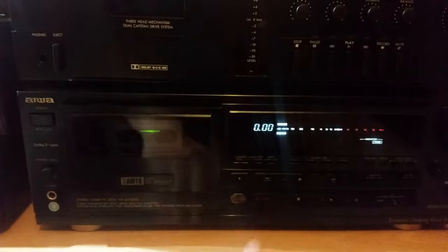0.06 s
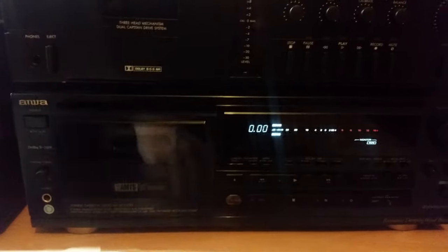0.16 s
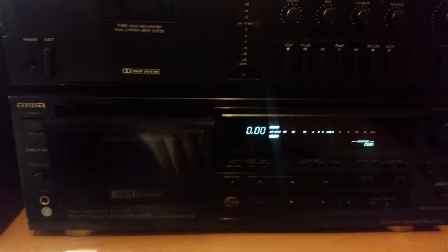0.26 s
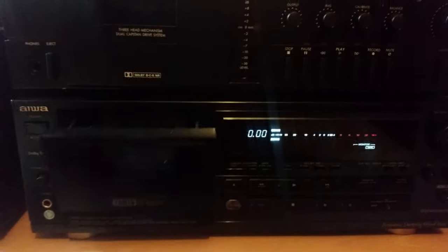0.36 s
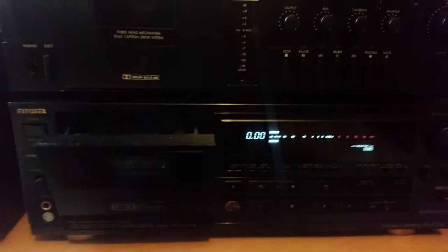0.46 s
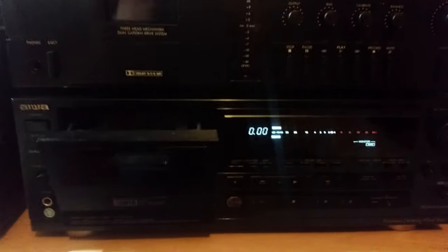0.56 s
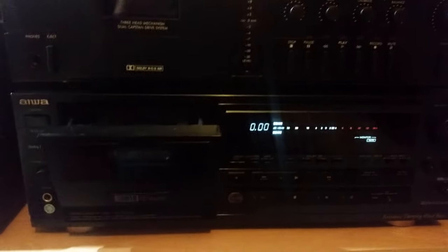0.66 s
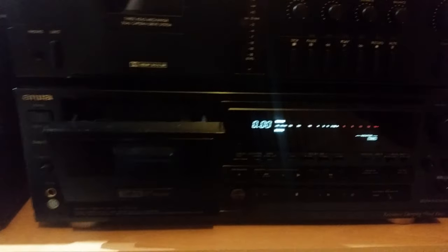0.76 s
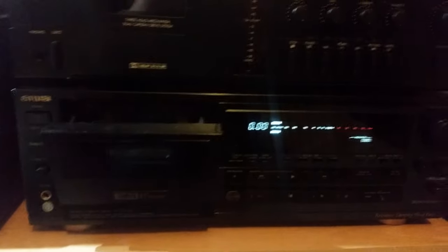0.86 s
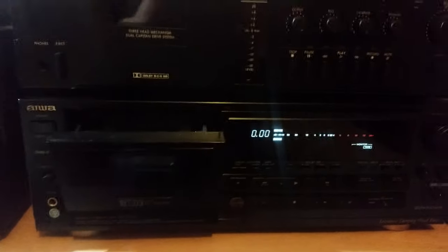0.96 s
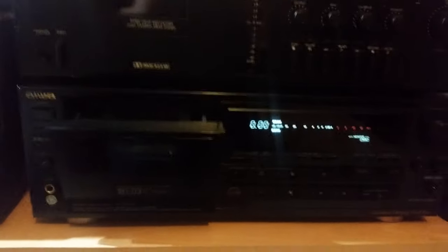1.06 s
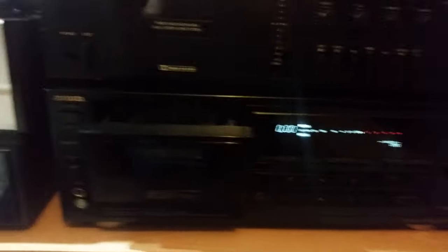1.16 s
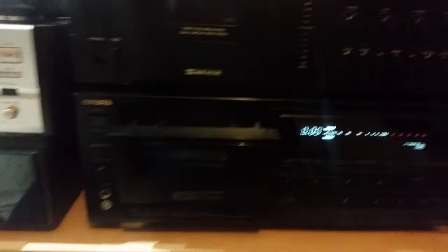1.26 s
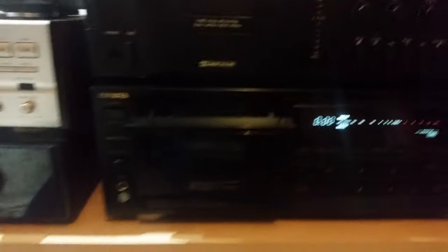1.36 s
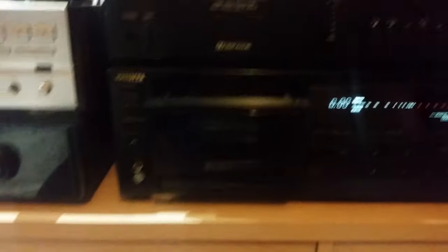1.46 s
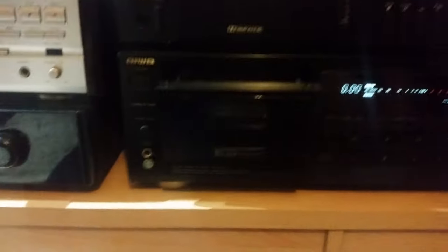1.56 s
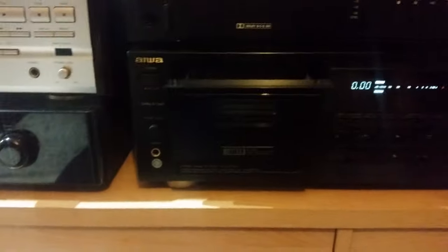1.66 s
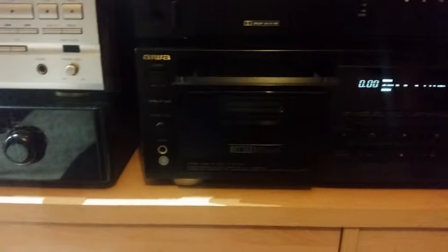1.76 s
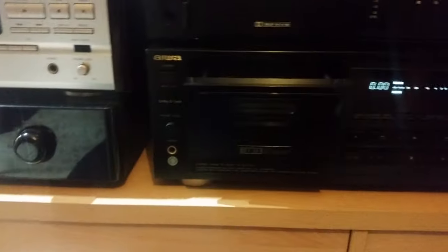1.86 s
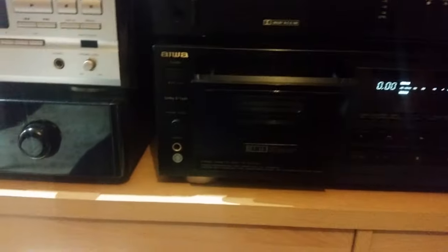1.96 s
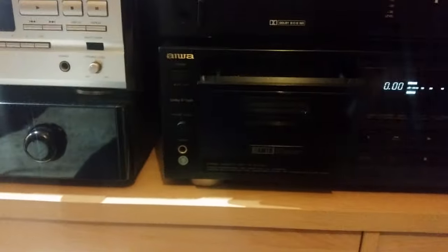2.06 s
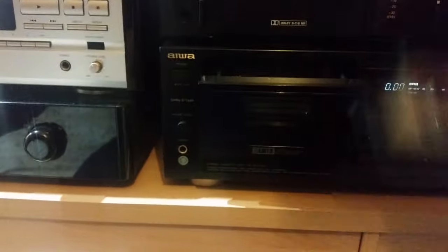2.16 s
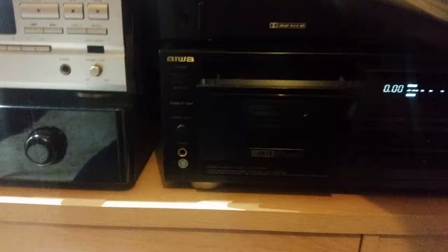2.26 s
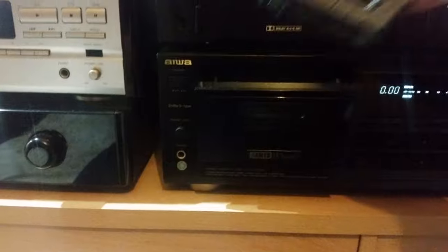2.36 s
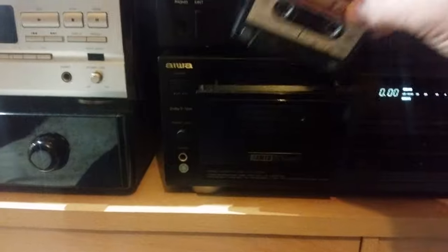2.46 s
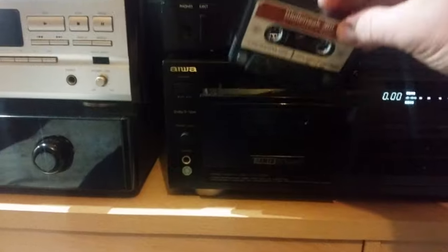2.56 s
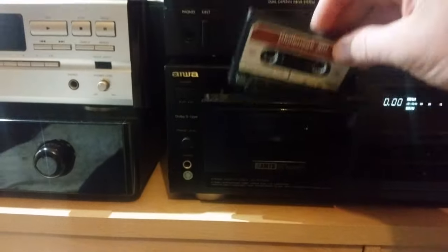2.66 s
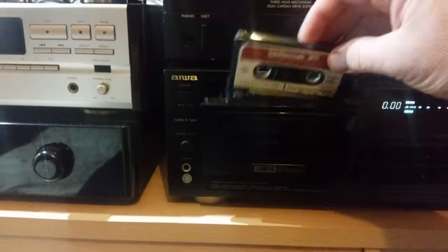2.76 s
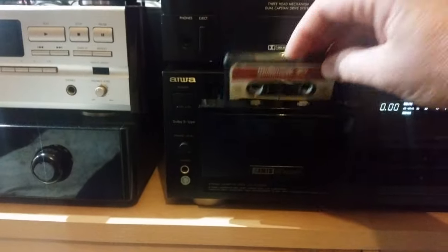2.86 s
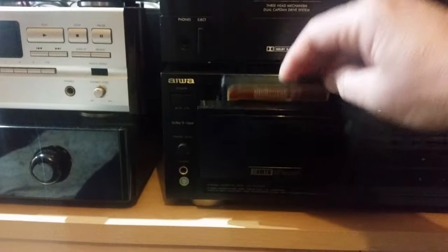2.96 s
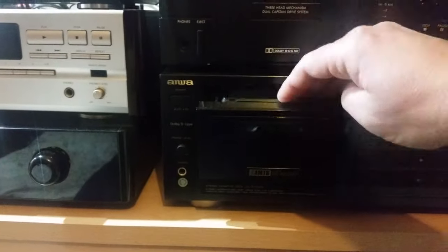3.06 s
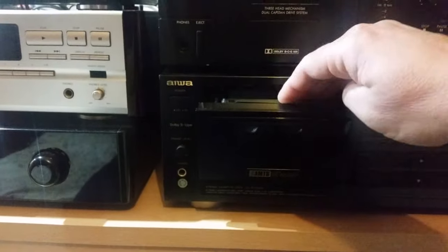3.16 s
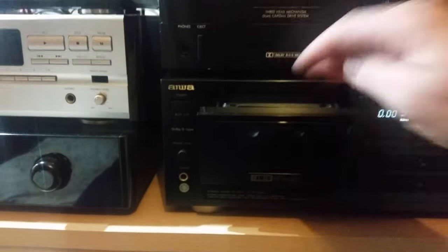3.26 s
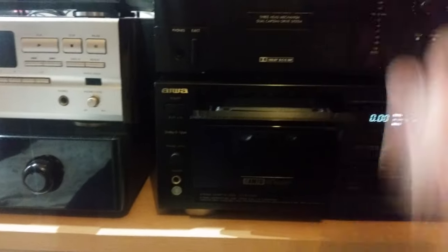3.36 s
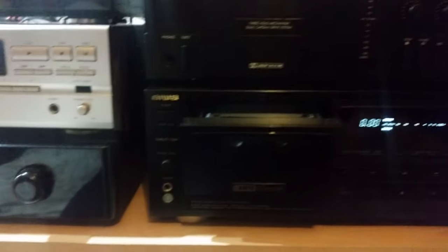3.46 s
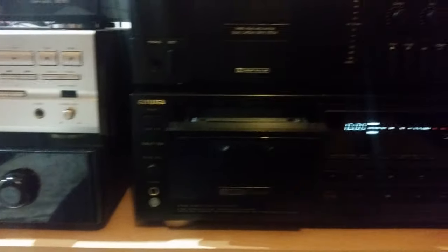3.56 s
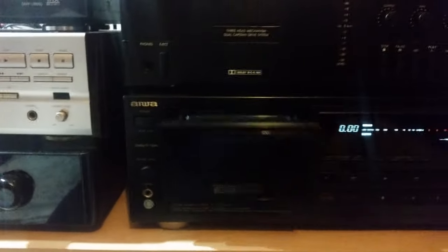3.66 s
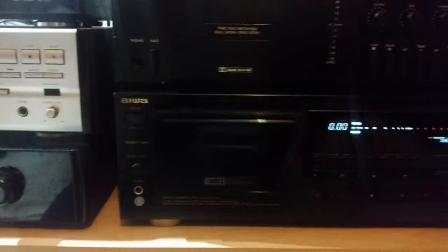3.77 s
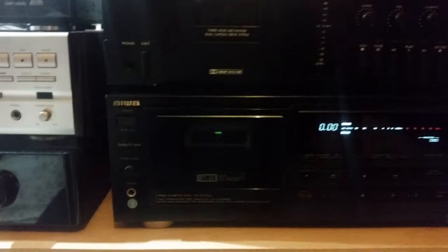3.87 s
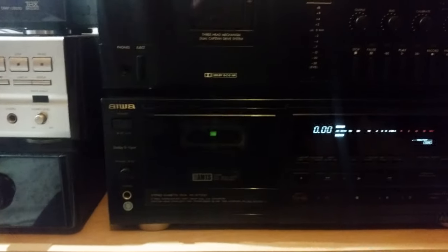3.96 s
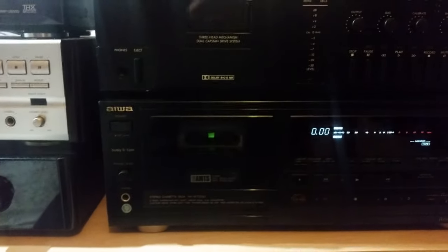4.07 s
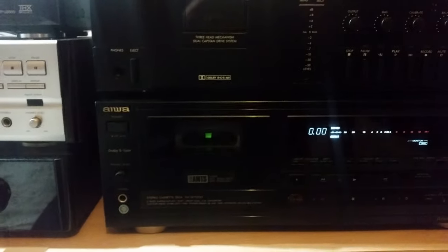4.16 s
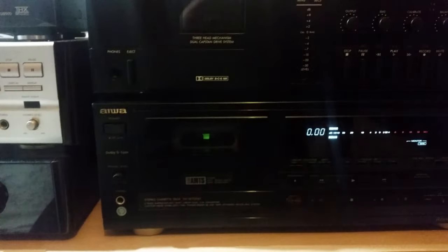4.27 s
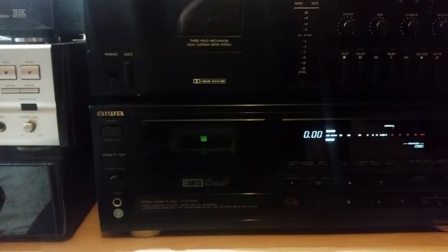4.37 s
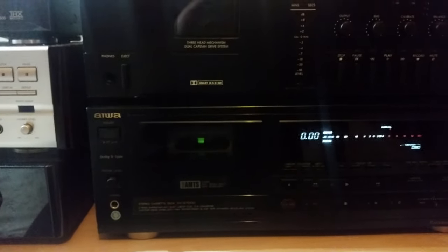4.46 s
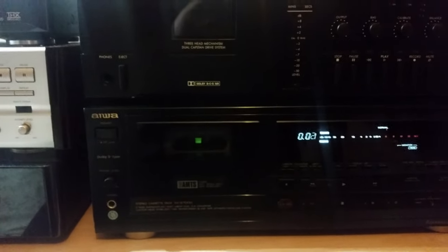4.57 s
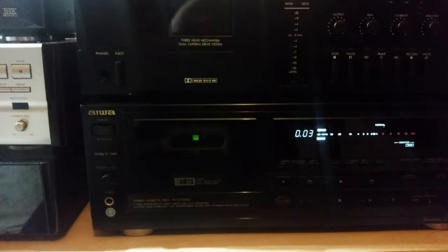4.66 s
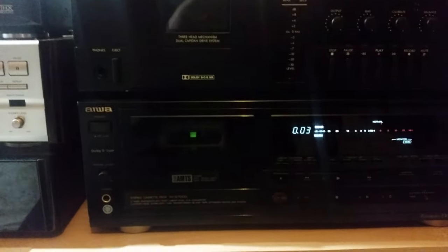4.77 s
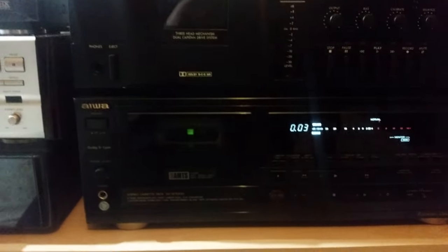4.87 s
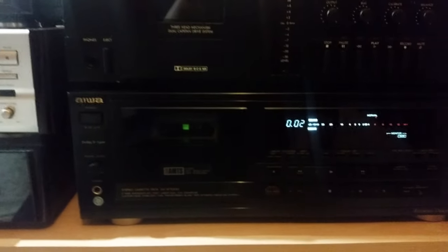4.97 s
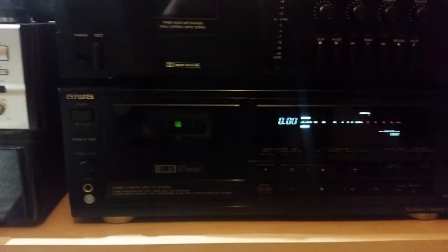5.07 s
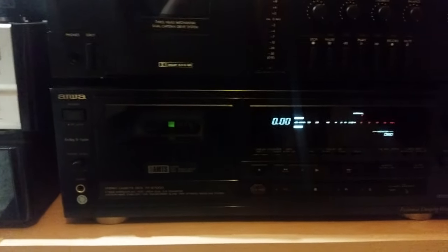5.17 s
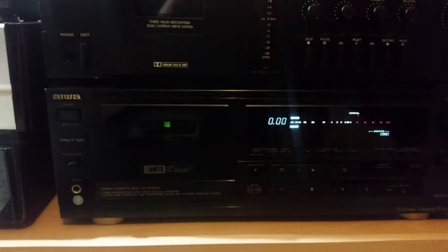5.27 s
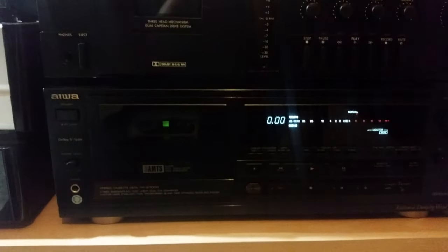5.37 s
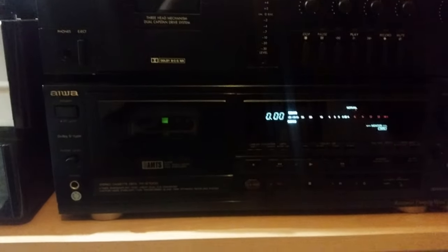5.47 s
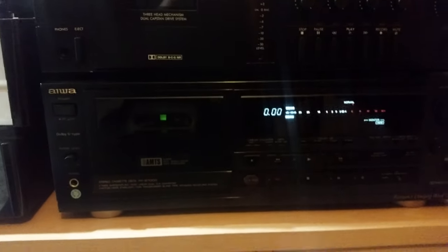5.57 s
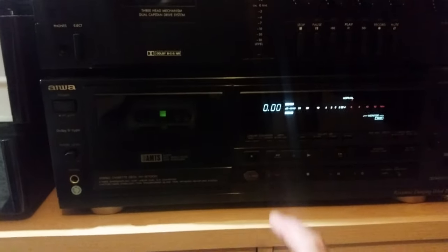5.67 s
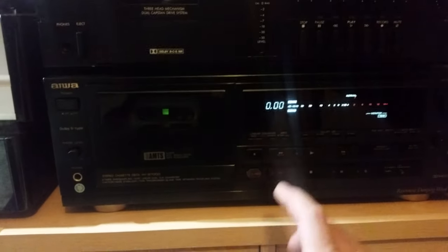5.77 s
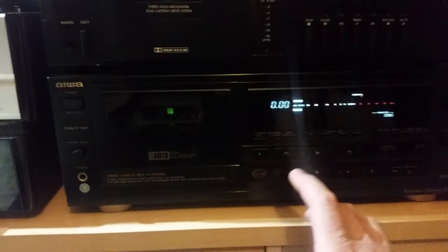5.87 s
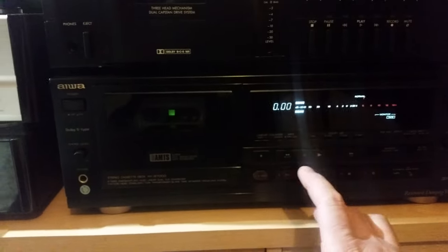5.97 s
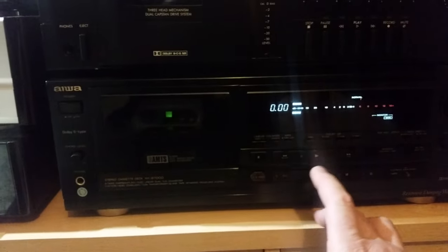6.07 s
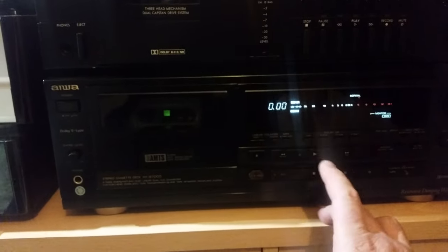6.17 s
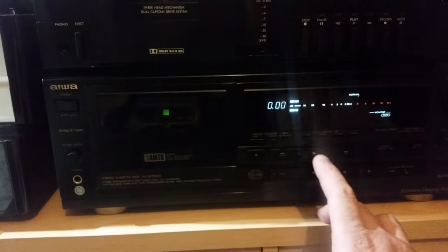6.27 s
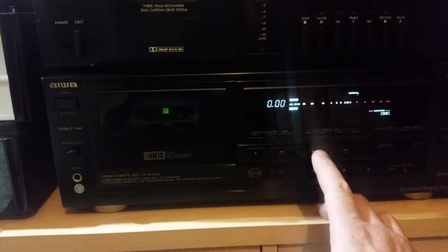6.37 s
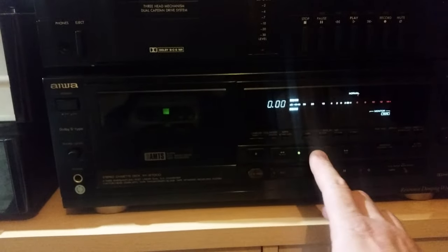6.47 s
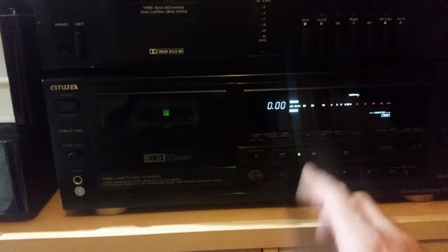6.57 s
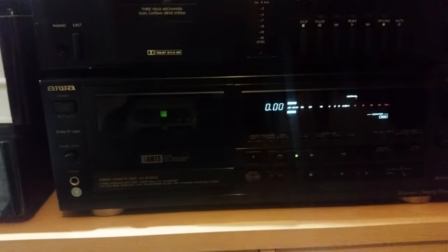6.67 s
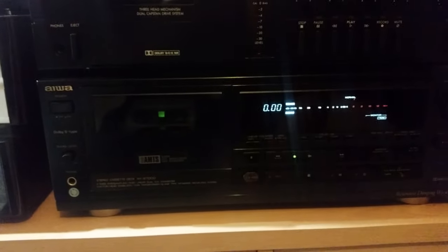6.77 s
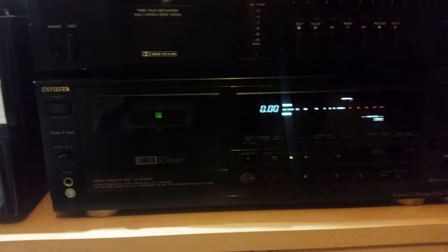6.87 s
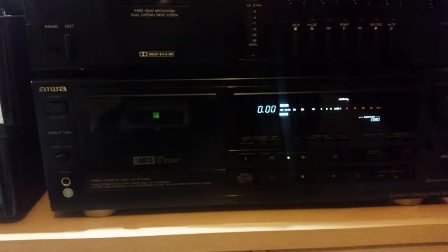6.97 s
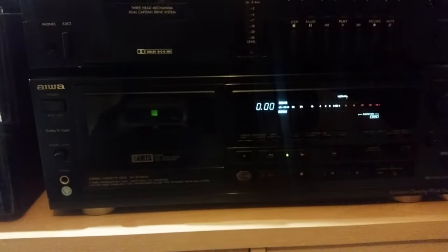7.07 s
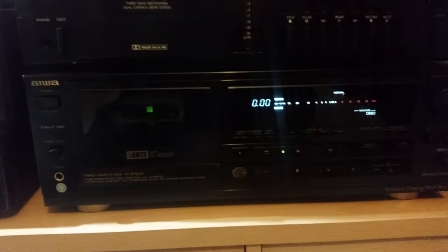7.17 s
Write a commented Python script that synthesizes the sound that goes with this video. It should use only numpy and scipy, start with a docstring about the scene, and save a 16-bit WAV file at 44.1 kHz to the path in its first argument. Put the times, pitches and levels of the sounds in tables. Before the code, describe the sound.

A quiet room with low rumble, rushing air and faint hiss, heard close through a hand-held camera. Tiny ticks come at the start and 0.3 s. From about 0.87 to 1.3 s fingers rub and bump the microphone: dull, heavy thumps, strongest near 1.2, with scrapes, sharp peeling ticks and a brief low ring. The background dips around 1.9. A crisp plastic click snaps at 2.35, with smaller ones after. At 2.75 the cassette knocks and slides in grainy scrapes, then clacks hard at 3.12 with rattling. Faint sliding at 3.7 and 3.95 leads to the door's loud, hollow clunk at 4.1. A short motor drone at 4.3 and irregular small clacks run until 5.25, with a faint spring ring at 4.8. Near-quiet follows. A key clicks at 6.5, then soft mechanical taps continue, with a firmer clunk at 7.2.

```python
"""Cassette deck at close range

In a quiet room a cassette is slid into a tape deck, the door is pushed shut and the transport clunks through
its steps; a key starts it again. Blows rattle loose parts and ring the chassis, and parts slide in fine grains.
A hand-held camera is close by: fingers shift their grip, rub and bump its two microphone ports and make its
case tick. Noise makes the rubs and decaying sines the rings, over low rumble, a rush of air and hiss."""
import sys
import numpy as np
from scipy.fft import rfft, irfft, next_fast_len
from scipy.io import wavfile

SR = 44100
rng = np.random.default_rng(int(sys.argv[2]) if len(sys.argv) > 2 else 0)


def materialize(psi):
    """Save the field psi as 16-bit PCM at rate SR to the path in sys.argv[1].

    A 1-D psi becomes a single channel; in a 2-D psi each row is a channel.
    """
    bounded = np.clip(np.atleast_2d(psi).T, -1, 1)
    quanta = np.round(bounded * 32767).astype(np.int16)
    wavfile.write(sys.argv[1], SR, quanta)


N = 318402  # length in samples
T = np.arange(SR // 2) / SR  # seconds since a blow


def amp(db):
    """Decibels to gain."""
    return 10 ** (np.asarray(db) / 20)


def unit(x):
    """Scale to rms 1."""
    return x / np.sqrt(np.mean(x ** 2) + 1e-20)


def fade(t60):
    """Exponential decay after a blow: 60 dB in t60 seconds."""
    return amp(-60 * T / max(t60, 1e-4))


def attack(rise):
    """Smooth onset of a blow with a time constant of rise seconds."""
    return 1 - np.exp(-T / rise)


def along(points, hz):
    """Values at hz, read from (Hz, value) points on a log axis."""
    f, v = np.transpose(points)
    return np.interp(np.log(hz + 1), np.log(f + 1), v)


def sides(lr_db):
    """Left and right gains with a mean of 1 for a left-right difference in dB."""
    g = amp(np.array([np.atleast_1d(lr_db), -np.atleast_1d(lr_db)]) / 2)
    return g / g.mean(0)


def noise(spectrum, pan=((1, 0),), alike=((1, 0),), size=N):
    """Coloured stereo noise whose middle has rms 1."""
    padded = next_fast_len(size)
    hz = np.fft.rfftfreq(padded, 1 / SR)
    common, apart = rfft(rng.standard_normal((2, padded)))
    # a wider turn mixes in more of the part that is opposite on the two sides
    turn = np.arccos(np.clip(along(alike, hz), -1, 1)) / 2
    pair = common * np.cos(turn) + np.array([apart, -apart]) * np.sin(turn)
    coloured = pair * amp(along(spectrum, hz)) * sides(along(pan, hz))
    x = irfft(coloured)[:, :size]
    return x / x.mean(0).std()


def grain(rate, depth_db, size=N):
    """Random gain of rms 1 with about rate new values a second."""
    knots = rng.standard_normal(size)
    wander = np.interp(np.arange(size) * rate / SR, np.arange(size), knots)
    return unit(amp(depth_db * np.clip(wander, -2, 2)))


def stroke(s, length, attack_s, release_s):
    """Gain of a movement that starts, holds for its length and dies away."""
    t = np.maximum(np.arange(N) / SR - s, 0)
    hold = np.exp(-np.clip((t - length) / release_s, 0, 50))
    return (1 - np.exp(-t / attack_s)) * hold


def add(track, s, x):
    """Mix a stereo sound in at time s."""
    start = round(s * SR)
    track[:, start:start + x.shape[1]] += x[:, :N - start]


# blows of the cassette, the door and the transport: start_s, level_db, body_db, snap_db
BLOWS = [(0.062, -46.5, 5, -12), (2.739, -31.5, -10, -18), (2.773, -28.5, -8.5, -13),
         (3.119, -19, -9.5, -1), (3.123, -15, -10.5, -14.5), (3.147, -21, -3.5, -13),
         (4.015, -24, -15, -18), (4.032, -37, -18, -5), (4.049, -34.5, -0.5, 1.5), (4.062, -33, -3, -9),
         (4.11, -13, -6.5, -13), (4.118, -30.5, -6, -1), (4.157, -43.5, -3, 1), (4.287, -34, -13, -25),
         (4.335, -39.5, 2, -25), (4.403, -34, -0.5, -28), (4.47, -30, -2, -11), (4.481, -32, 3.5, -17),
         (4.523, -31, 1, -6), (4.625, -27, -4, -15), (4.639, -36, -2, -1.5), (4.712, -34, 2, -7),
         (4.733, -30.5, -2, -6), (4.82, -34, -37, -6), (4.907, -26.5, -3.5, -13.5),
         (4.958, -31.5, -0.5, -6.5), (5.044, -30, -13, -12.5), (5.082, -29.5, -1, -12.5),
         (5.138, -34, -1, -7), (5.162, -29, -3.5, -8), (5.221, -38.5, -3, -23), (5.248, -32.5, -6, -6.5),
         (6.512, -29.5, -23, -37), (6.614, -35, -7.5, -20), (6.633, -33, -11, -32),
         (6.706, -35.5, -2.5, -24), (6.866, -31.5, 3, -20), (6.91, -31.5, -6.5, -11.5),
         (7.038, -34.5, -5.5, -8.5), (7.098, -36.5, -1, -10), (7.182, -24, -14, -9)]
# tone of the loose parts: pitch_hz, level_db
CLATTER = [(25, -33), (60, -21.5), (200, 9.5), (400, -22.5), (600, -2), (900, -6), (1500, -1), (2100, -6),
           (2600, -10.5), (3800, -12.5), (5500, -32.5), (9000, -41.5), (16000, -53)]
# tone of the bright crack: pitch_hz, level_db
SNAP = [(1500, -33), (4000, 0.5), (6000, -8.5), (8500, -11.5), (11500, 0.5), (15000, 4.5), (16000, -1),
        (17000, -66)]
# how far the deck sits to the left: pitch_hz, left_minus_right_db
DECK_PAN = [(100, 1.5), (380, 4), (700, 6.5), (1300, 10.5), (2400, 14), (4400, 2), (8000, 3.5), (12000, -2),
            (15000, 6.5)]
# how alike the deck is at the two ports: pitch_hz, likeness (1 = same)
DECK_ALIKE = [(100, 0.92), (640, 0.82), (1400, 0.57), (3000, 0.085)]
USUAL_BLOW_DB, RATTLE_T60_S = -24.5, 0.061  # a blow at the usual level rattles this long
RATTLE_DOUBLES_DB = 32  # a blow harder by this much rattles twice as long
TRAY_SHEET_DB, CLOSED_S = -6, 3.8  # the sheet panels ring less while the door hangs open
LEAD_S, LEAD_DB = .006, -20  # parts graze each other just before they strike


def deck():
    """Each blow cracks, then loose plastic and steel parts rattle; the chassis rings and the room answers."""
    out = np.zeros((2, N))
    size = len(T)
    for s, db, body_db, snap_db in BLOWS:
        rattle_t60 = RATTLE_T60_S * 2 ** ((db - USUAL_BLOW_DB) / RATTLE_DOUBLES_DB)
        contacts = grain(rate=820, depth_db=4.0, size=size) * attack(0.00076)
        strike = amp(3.5) * fade(0.0064) * attack(0.00055)
        # the slow last term of each envelope is the room's answer
        clatter_gain = strike + contacts * fade(rattle_t60) + amp(-9) * fade(0.24)
        clatter = noise(CLATTER, DECK_PAN, DECK_ALIKE, size) * clatter_gain
        snap_gain = contacts * fade(0.58 * rattle_t60) + amp(-11) * fade(0.22)
        snap = noise(SNAP, DECK_PAN, size=size) * snap_gain
        sheet_db = TRAY_SHEET_DB * (2 < s < CLOSED_S)
        body = chassis(body_db - 0.5, body_db + 1.0 + sheet_db)
        graze = noise(CLATTER, DECK_PAN, DECK_ALIKE, size) * fade(0.068)
        add(out, s - LEAD_S, amp(db + LEAD_DB) * graze)
        add(out, s, amp(db) * (amp(-10.0) * clatter + amp(snap_db - 5.0) * snap + amp(-2.5) * body))
    return out


# modes of the deck's chassis and panels: pitch_hz, level_db, t60_s
CHASSIS = [(92, -3.5, 0.34), (132.5, -16.5, 0.45), (153.1, -7.5, 0.39), (173.4, 3, 0.17), (217.9, 3, 0.18),
           (284, -1, 0.12), (515.5, -0.5, 0.14), (556.2, 4.5, 0.1), (620, 4.5, 0.062), (737, -12, 0.16),
           (949.6, -3.5, 0.059), (1242, -6.5, 0.063), (1429, -12, 0.058), (1577, -7.5, 0.045),
           (1890, -18, 0.16), (2077, -23.5, 0.15), (2240, -25, 0.17), (2360, -30, 0.057),
           (2960, -21.5, 0.096), (3220, -28, 0.093)]


def chassis(thud_db, panel_db, bass_db=-4, sheet_db=-3, scatter_db=2, detune=.012, rise=0.0041):
    """Blows ring modes at new strengths, shifted by the load; heavy parts drive the frame and sheet panels."""
    ring = 0
    for hz, db, t60 in CHASSIS:
        level, shift, phase, skew = rng.standard_normal(4)
        weight_db = thud_db + bass_db if hz < 400 else panel_db + sheet_db if hz < 800 else 0
        # high modes reach the two ports out of step
        apart = skew * np.arccos(np.clip(along(DECK_ALIKE, hz), -1, 1))
        shifted_hz = hz * (1 + detune * shift)
        wave = np.sin(2 * np.pi * shifted_hz * T + np.pi * phase + np.array([[0], [apart]]))
        gain = amp(db + weight_db + scatter_db * level) * sides(along(DECK_PAN, hz))
        ring = ring + gain * fade(t60) * wave
    return ring * attack(rise)


# runs of the cam motor: start_s, length_s, drone_db, gear_db
RUNS = [(4.297, 0.083, -40.5, -51.5), (4.44, 0.823, -56, -54.5), (6.6, 0.46, -54.5, -58.5)]
# tone of the drone: pitch_hz, level_db
DRONE = [(60, -16), (100, 7), (170, 4.5), (230, -3), (380, -50.5)]
SPIN_UP_S, SPIN_DOWN_S = 0.015, 0.038


def motor():
    """The motor drones through the chassis while it turns the cam."""
    load = sum(amp(db) * stroke(s, length, SPIN_UP_S, SPIN_DOWN_S) for s, length, db, _ in RUNS)
    return load * noise(DRONE, DECK_PAN, DECK_ALIKE)


# modes of a small spring: pitch_hz, level_db, t60_s
SPRING = [(3240, -2.5, 0.41), (5030, -8, 0.32), (6700, -23, 0.21), (7262, -17, 0.13), (9771, -23, .25)]
LEAD_IN_S, LEAD_IN_DB = 0.037, -4  # a softer ring fades in shortly before the main ring


def spring(s=4.821, db=-50):
    """A small spring rings and shivers, with a soft lead-in."""
    out = np.zeros((2, N))
    lead_in = amp(LEAD_IN_DB) * attack(0.0076)
    for start, swell in [(s, 1), (s - LEAD_IN_S, lead_in)]:
        ring = 0
        for hz, level, t60 in SPRING:
            wave = np.sin(2 * np.pi * (hz * T + rng.random()))
            shiver = grain(rate=120, depth_db=5.0, size=len(T))
            ring = ring + amp(db + level) * fade(t60) * wave * shiver
        add(out, start, sides(2.6) * swell * ring)
    return out


# plastic slides on plastic, as the cassette goes in and the door swings: start_s, length_s, level_db
SLIDES = [(2.3, 0.016, -49.5), (2.772, 0.14, -57.5), (2.911, .02, -47.5), (2.961, 0.132, -47),
          (3.185, 0.14, -53), (3.666, 0.12, -53.5), (3.952, 0.15, -46)]
# tone of the sliding plastic and the gears: pitch_hz, level_db
FRICTION = [(300, 4.5), (1000, 3), (1900, 2.5), (2800, -7), (4500, -9.5), (6500, -26.5), (8500, -32),
            (12000, -14.5), (16000, -17), (17000, -48)]
SLIDE_ATTACK_S, SLIDE_RELEASE_S = 0.0054, 0.021
SLIDE_SWELL_DB = 9.5  # the push grows by this much through each slide


def sliding():
    """The cassette shell, the hinge and the gears catch and slip in fine grains."""
    t = np.arange(N) / SR
    push = 0
    for s, length, db in SLIDES:
        swell_db = SLIDE_SWELL_DB * np.clip((t - s) / length - 1, -1, 0)
        push = push + amp(db + swell_db) * stroke(s, length, SLIDE_ATTACK_S, SLIDE_RELEASE_S)
    gears = sum(amp(db) * stroke(s, length, SPIN_UP_S, SPIN_DOWN_S) for s, length, _, db in RUNS)
    catches = grain(rate=77, depth_db=1.0) * grain(rate=600, depth_db=3)
    return (push + gears) * catches * noise(FRICTION, DECK_PAN, DECK_ALIKE)


# strokes of skin over the ports: start_s, length_s, scrape_db, judder_db, left_minus_right_db
RUBS = [(0.874, 0.037, -27.5, -47, 22), (0.9146, 0.0577, -21, -12.5, 34), (0.978, 0.041, -20.5, -24.5, 24),
        (1.023, 0.096, -40.5, -34.5, 20), (1.159, 0.034, -19.5, -18, 4), (1.202, 0.113, -47, -36.5, 8)]
# fingertips bump a port: start_s, level_db, pitch_hz, left_minus_right_db
BUMPS = [(0.551, -31.5, 106, -3), (0.876, -20.5, 157, 26), (0.9164, -12.5, 114, 34), (1.027, -6.5, 82, 30),
         (1.0571, -3, 370, 42), (1.062, -7.5, 105, 39), (1.1753, 4.5, 640, 20), (1.183, -10, 59.6, -7),
         (1.189, -10, 129, -29), (1.1926, -9.5, 168, 36), (1.253, -9, 182, -20)]
# skin peels off, mostly at the right port: start_s, level_db
PEELS = [(1.069, -33.5), (1.134, -22.5), (1.1456, -16.5), (1.1532, -16), (1.172, -24), (1.191, -19),
         (1.255, -24.5), (1.304, -29.5)]
# tone of scraping skin: pitch_hz, level_db
SCRAPE = [(100, -1), (300, 2.5), (900, -1.5), (1800, -6), (2800, -26.5), (4000, -22.5), (6000, -54),
          (10000, -44)]
# tone of juddering skin: pitch_hz, level_db
JUDDER = [(15, -15), (50, -13), (130, 1), (220, -6.5), (400, -6.5), (900, -55.5)]
RUB_ATTACK_S, RUB_RELEASE_S = 0.0017, .005
RUB_HISS_DB, RUB_HISS_SPREAD = -29.5, 0.33  # hiss under the scrape; share of the L-R difference that it keeps


def fingers():
    """Skin judders across the ports, bumps them and peels off in sharp ticks."""
    scrape = amp(-8.5) * noise(SCRAPE) * grain(rate=500, depth_db=3)
    judder = amp(-11.0) * noise(JUDDER)
    hiss = amp(RUB_HISS_DB) * noise(SNAP)
    out = np.zeros((2, N))
    for s, length, scrape_db, judder_db, lr_db in RUBS:
        drag = sides(lr_db) * (amp(scrape_db) * scrape + amp(judder_db) * judder)
        rub_hiss = sides(RUB_HISS_SPREAD * lr_db) * amp(scrape_db) * hiss
        out += stroke(s, length, RUB_ATTACK_S, RUB_RELEASE_S) * (drag + rub_hiss)
    for s, db, hz, lr_db in BUMPS:
        # the skin slaps, and the air trapped in the port swings about once
        slap = amp(-17.0) * noise(SCRAPE, size=len(T)) * fade(0.0088)
        push = np.sin(2 * np.pi * hz * T) * fade(3.96 / hz)
        add(out, s, amp(db - 5.0) * sides(lr_db) * (slap + push) * attack(0.00032))
    for s, db in PEELS:
        add(out, s, amp(db - 11.5) * sides(-9) * noise(SNAP, size=len(T)) * fade(0.0059))
    return out


def camera_ring(s=1.194, hz=242, db=-25, t60=0.36):
    """A low ring in the camera's body follows the cluster of bumps."""
    out = np.zeros((2, N))
    add(out, s, amp(db) * sides(29) * np.sin(2 * np.pi * hz * T) * fade(t60))
    return out


# small plastic ticks of the camera case, the cassette and the key:
# start_s, level_db, pitch_hz, crack_db, left_minus_right_db
TICKS = [(0.024, -39.5, 1070, 10, -3), (0.2869, -26, 1550, -18, 20), (1.311, -37, 1900, -4, 13.5),
         (1.377, -31.5, 1690, -8, 13), (1.506, -41.5, 1500, -13, 12), (2.3455, -11, 1720, -18.5, 10),
         (2.367, -21, 1640, -16, 10), (2.383, -30.5, 1750, -9, 17), (2.437, -22, 2230, -3, 20),
         (2.452, -23.5, 1490, -13, 11), (2.7743, -26, 1090, 2, 12), (3.124, -13, 2050, -13, 11),
         (3.283, -38, 1950, -0.5, 11), (6.498, -47, 1500, 9, 7), (6.512, -29.5, 1560, -5, 12)]
# modes of a tick: pitch_ratio, level_db, t60_s
CASE = [(0.998, 7.5, 0.0078), (1.28, -7.5, 0.023)]
# tone of the plastic shell: pitch_hz, level_db
CASE_TONE = [(400, -33), (900, 5), (1500, 6.5), (2100, 6), (2700, -4.5), (3300, -7.5), (4200, -16.5),
             (6000, -53), (9000, -38)]


def ticks():
    """Stiff plastic gives way with a very short ring; a crack spreads wider and the room answers faintly."""
    out = np.zeros((2, N))
    for s, db, hz, crack_db, lr_db in TICKS:
        ring = sum(amp(level) * fade(t60) * np.sin(2 * np.pi * hz * ratio * T) for ratio, level, t60 in CASE)
        crack_gain = amp(crack_db - 15.0) * (fade(0.016) + amp(-21.5) * fade(0.33))
        crack = noise(SNAP, size=len(T)) * crack_gain
        shell_gain = amp(crack_db - 0.5) * fade(0.0066) + amp(-30.5) * fade(0.27)
        shell = noise(CASE_TONE, size=len(T)) * shell_gain
        add(out, s, amp(db) * (sides(lr_db) * (ring + shell) + crack) * attack(0.0009))
    return out


# level of the background: start_s, level_db
ROOM = [(0, 0), (.7, -2.5), (1.5, -1.5), (1.92, -10), (2.25, -0.5), (3.7, 1.5), (4.3, 4), (5.7, -0.64),
        (6.4, -0.9), (7.22, 3)]
# tone of the low rumble: pitch_hz, level_db
RUMBLE = [(15, -6), (30, -8), (53, -1), (85, -6.5), (130, -8), (200, -13.5), (350, -21.5), (800, -65)]
# tone of the rush of air: pitch_hz, level_db
AIR = [(120, -1), (350, -9), (600, -2), (950, 1.5), (1350, -3.5), (1600, -8), (2100, -9.5), (2800, -27),
       (3400, -19), (4100, -11.5), (4900, -28), (6300, -46), (9000, -59)]
# tone of the microphone hiss: pitch_hz, level_db
HISS = [(3000, -48), (6000, -71), (8500, -21.5), (10500, -15), (12500, -3.5), (14000, -11), (15000, 12),
        (15700, 10), (16050, -12), (16200, -48)]
# how far the background leans to the left: pitch_hz, left_minus_right_db
ROOM_PAN = [(60, 18.5), (110, 7), (350, -0.5), (700, 14.5), (1300, 18), (2400, 8), (4400, 11), (8000, -4),
            (15000, 9)]
RUMBLE_DB, AIR_DB, HISS_DB = -54, -55, -67.5  # where the background level is 0 dB
RUMBLE_FOLLOWS, HISS_FOLLOWS = 0.68, 1.4  # dB for each dB of the background


def room():
    """Low rumble, a steady rush of air and microphone hiss drift together and sink for a moment."""
    start_s, point_db = np.transpose(ROOM)
    level_db = np.interp(np.arange(N) / SR, start_s, point_db)
    rumble = noise(RUMBLE, ROOM_PAN, [(100, 0.39)]) * grain(rate=26, depth_db=-0.3)
    air = noise(AIR, ROOM_PAN, [(1000, 0.092)])
    hiss = noise(HISS, ROOM_PAN)
    low = amp(RUMBLE_DB + RUMBLE_FOLLOWS * level_db) * rumble
    return low + amp(AIR_DB + level_db) * air + amp(HISS_DB + HISS_FOLLOWS * level_db) * hiss


def scene():
    """The deck, the hand on the camera and the room."""
    machine = deck() + motor() + spring() + sliding()
    return machine + fingers() + camera_ring() + ticks() + room()


TOP_HZ = 16900  # the camera's band limit


def record(dry):
    """The camera keeps nothing above its band limit."""
    size = next_fast_len(N + SR)
    kept = np.fft.rfftfreq(size, 1 / SR) < TOP_HZ
    return irfft(rfft(dry, size) * kept, size)[:, :N]


dry = scene()
out = record(dry)
materialize(out)
```